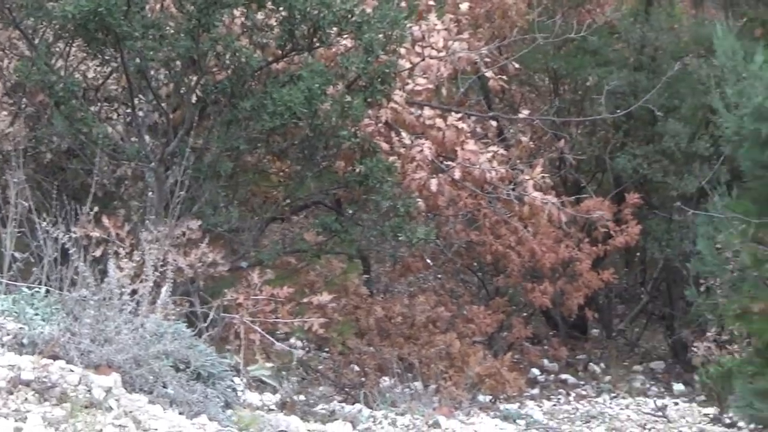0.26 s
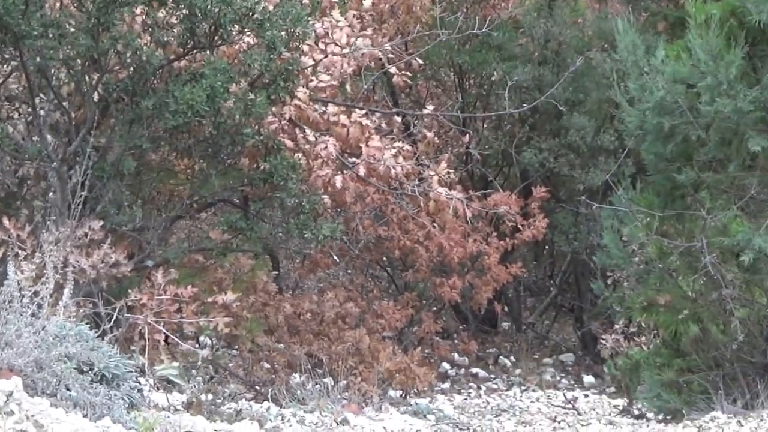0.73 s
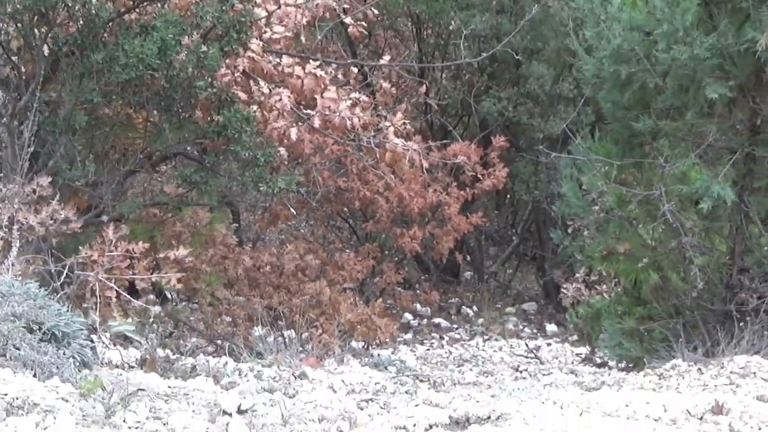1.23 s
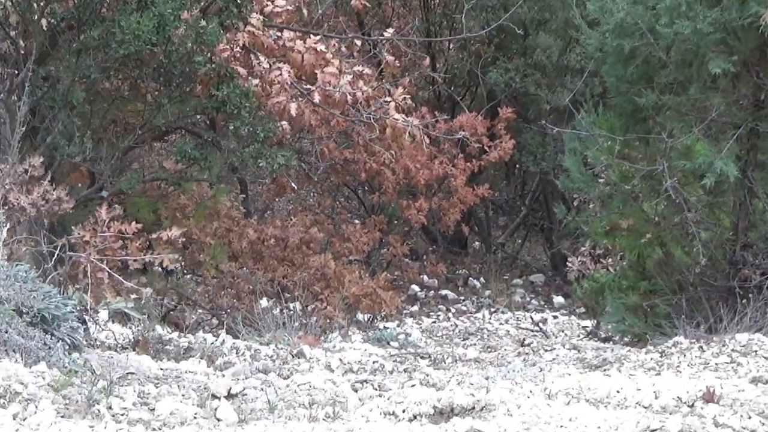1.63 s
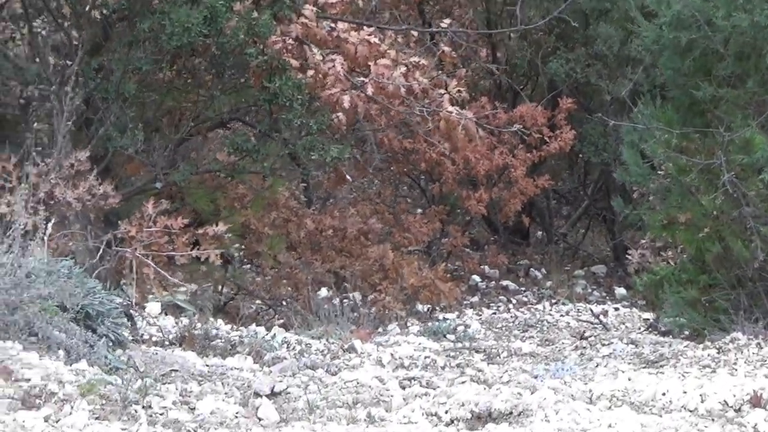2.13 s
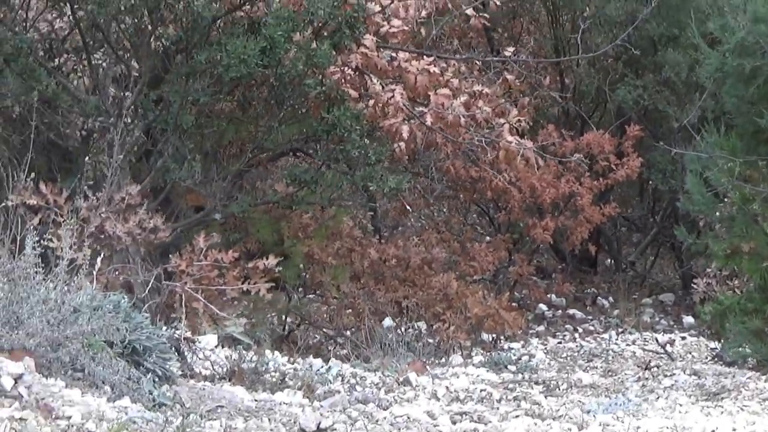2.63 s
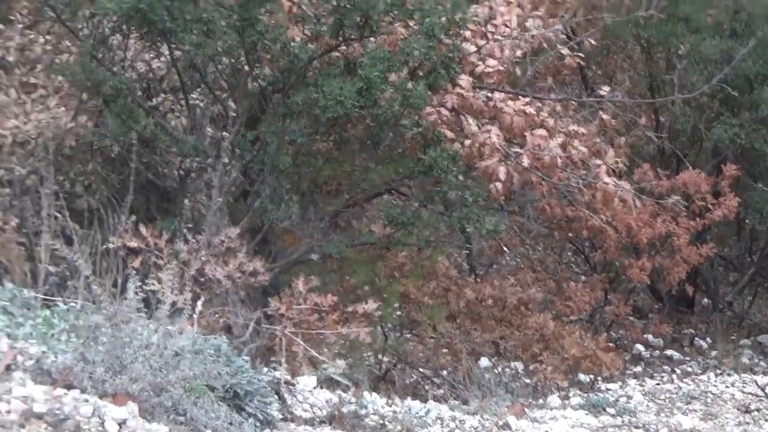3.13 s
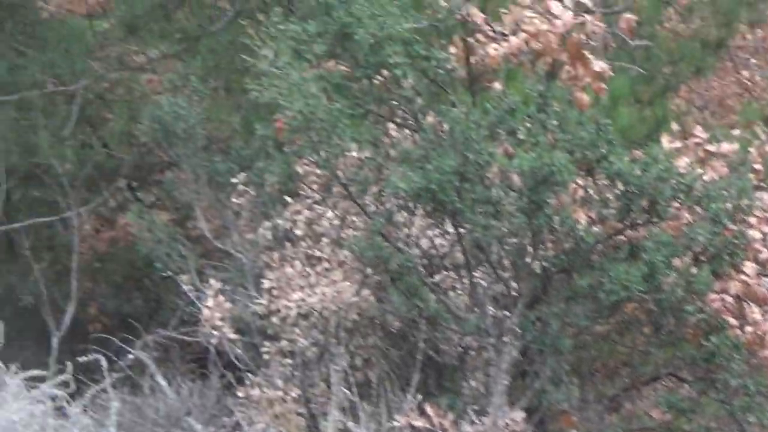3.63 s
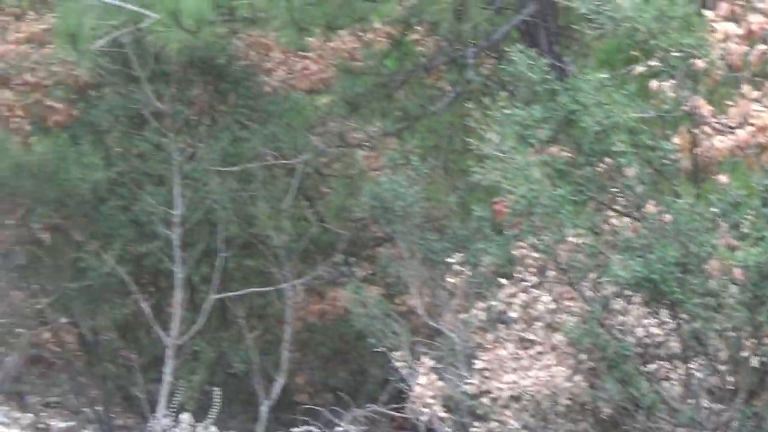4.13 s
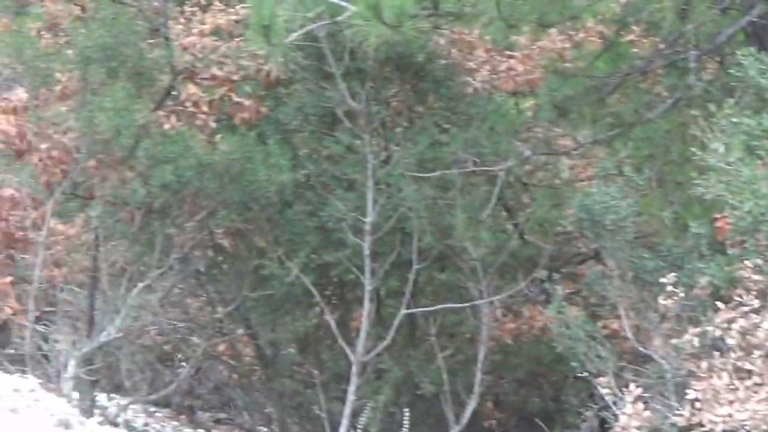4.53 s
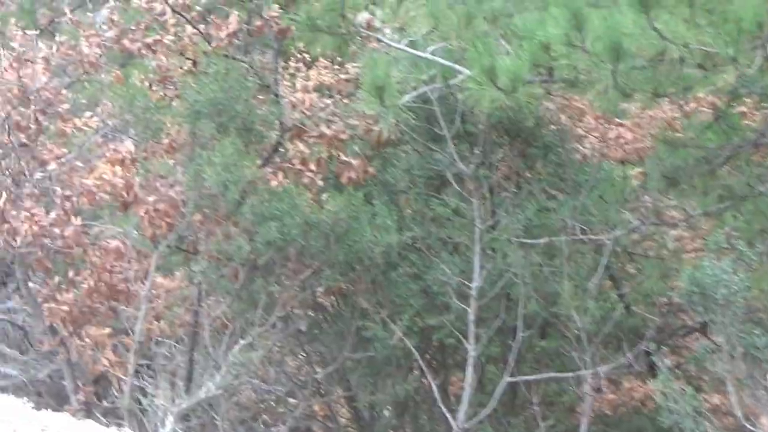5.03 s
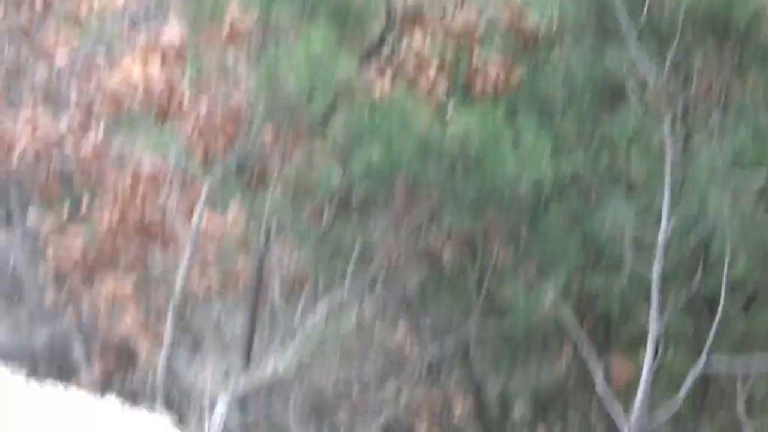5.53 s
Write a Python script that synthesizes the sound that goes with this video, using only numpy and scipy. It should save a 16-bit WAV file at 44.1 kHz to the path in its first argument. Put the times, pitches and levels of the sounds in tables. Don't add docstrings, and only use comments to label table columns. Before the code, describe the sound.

Sharp twig cracks and growing leaf rustle in still woodland, mixed with close camera handling scrapes, creaks and late dull knocks and pebble clicks.

```python
import sys
import numpy as np
from scipy import signal
from scipy.fft import rfft, irfft, next_fast_len
from scipy.io import wavfile
from scipy.ndimage import map_coordinates

SR = 44100
rng = np.random.default_rng(int(sys.argv[2]) if len(sys.argv) > 2 else 0)


def decibels_to_gain(level_db):
    exponent = np.asarray(level_db, float) / 20
    return 10 ** exponent


def put_to_file(sound):
    columns = np.atleast_2d(sound).T
    safe = np.clip(columns, -1, 1)
    whole_steps = np.round(safe * 32767)
    wavfile.write(sys.argv[1], SR, whole_steps.astype(np.int16))


N = 254495


def unit(x):
    return x / np.sqrt(np.mean(x ** 2) + 1e-20)


def along(points, hz):
    f, db = np.transpose(points)
    return decibels_to_gain(np.interp(np.log(hz + 1), np.log(f + 1), db, left=-120, right=-120))


def modes(rows, f):
    total = 0
    for k, (centre, width, db) in enumerate(rows):
        damping = 1j * f * width
        total = total + (-1) ** k * decibels_to_gain(db) * damping / (centre * centre - f * f + damping)
    return total


def filtered(x, response):
    m = next_fast_len(N + 8192)
    return irfft(rfft(x, m) * response(np.fft.rfftfreq(m, 1 / SR)), m)[..., :N]


def shaped(x, points):
    return unit(filtered(x, lambda f: along(points, f)))


def band(x, low_hz, high_hz):
    return signal.lfilter(*signal.butter(2, [low_hz, high_hz], "bandpass", fs=SR), x)


def woody(x, hz, sharpness):
    return signal.lfilter(*signal.iirpeak(hz, sharpness, fs=SR), x)


def curves(rows):
    s, *cols = np.transpose(rows)
    return [np.interp(np.arange(N) / SR, s, c, left=-120, right=-120) for c in cols]


def wobble(rate):
    knots = rng.standard_normal(int(N * rate / SR) + 4)
    return map_coordinates(knots, [np.arange(N) * rate / SR])


def swells(rows, rise_db_s, fall_db_s, rest_db=-120):
    t = np.arange(0, N / SR + .002, .001)[:, None]
    s, db, hold = np.transpose(rows)
    rise = rise_db_s * np.maximum(s - t, 0)
    fall = fall_db_s * np.maximum(t - s - hold, 0)
    power = np.interp(np.arange(N) / SR, t[:, 0], decibels_to_gain(2 * (db - rise - fall)).sum(axis=1))
    return 10 * np.log10(power + decibels_to_gain(2 * np.asarray(rest_db)))


def crackle(rate, spread_db, t60, share):
    size = decibels_to_gain(spread_db * np.minimum(rng.exponential(size=N), 2.8)) * (rng.random(N) < rate / SR)
    puffs = signal.lfilter([1], [1, -decibels_to_gain(-60 / (t60 * SR))], size)
    hiss = np.sqrt(abs(1 - share ** 2)) * rng.standard_normal(N)
    return share * unit(puffs * rng.standard_normal(N)) + hiss


def rub(rows, rate, share):
    slips = crackle(rate, 2.5, .01, share)
    return unit(filtered(slips, lambda f: modes(rows, f) ** 2))


def placed(x, pan_db, loose_db):
    apart = decibels_to_gain(loose_db) * signal.lfilter([.5, .5], [1], np.roll(x, 700))
    return np.array([(x + apart) * decibels_to_gain(pan_db / 2), (x - apart) * decibels_to_gain(-pan_db / 2)])


def empty():
    return np.zeros((2, N + SR))


def seconds(length):
    return np.arange(int(length * SR)) / SR


def add(out, s, sound, pan_db):
    out[:, round(s * SR):][:, :len(sound)] += sound * decibels_to_gain(np.array([[pan_db / 2], [-pan_db / 2]]))


# frequency in Hz, level in dB per Hz.
WOOD_AIR = [(15, -41), (25, -3), (60, -1), (157, -3), (212, 5.5), (416, 3.5), (775, -7.5), (1020, -37),
            (1230, -5.5), (1650, -9), (4250, -15.5), (6380, -4), (10100, -16.5), (16000, -13)]


def air():
    level_db = -49.5 - 4.5
    return placed(decibels_to_gain(level_db) * shaped(rng.standard_normal(N), WOOD_AIR), 0.27, -16.5)


# centre in Hz, width in Hz, level in dB.
PALM_MODES = [(319, 123, 3.5), (500, 190, -4)]
# start in seconds, level in dB, hold in seconds.
PALM_SLIDES = [(0, -55.5, 0.21), (.4, -54, 0.21), (.7, -48.5, 0.022), (.87, -49, 0.022), (1.36, -59, .03),
               (1.45, -52, 0.12), (1.65, -48.5, 0.11), (1.88, -54, 0.068), (3.26, -53, .08),
               (3.36, -48, 0.18), (3.6, -54.5, 0.17), (3.94, -52.5, 0.24), (4.17, -49, 0.18),
               (4.675, -34, 0.011), (4.77, -44, 0.044), (5.09, -44.5, 0.075), (5.4, -51, 0.091),
               (5.7, -45, 0.0097)]


def palm():
    level_db = swells(PALM_SLIDES, 330, 220, rest_db=-63) - 2.7
    return placed(decibels_to_gain(level_db) * rub(PALM_MODES, 320, 0.47), 5.7, -35)


# frequency in Hz, level in dB per Hz.
ARM_RUMBLE = [(15, -44), (25, -20), (48, -11), (75, 0), (113, -1.5), (156, 0), (260, -6.5), (340, -36),
              (570, -120)]
# centre in Hz, width in Hz, level in dB.
SCUFF_MODES = [(536, 990, 0)]
# time in seconds, sway level in dB, grip level in dB.
HAND_LEVELS = [(0, -64, -57.5), (.6, -56.5, -61.5), (.95, -58, -56.5), (1.1, -62, -62), (1.32, -65, -58.5),
               (2.5, -59.5, -66), (2.97, -55.5, -65), (3.57, -54, -56.5), (4.05, -61, -57),
               (4.32, -52, -49.5), (4.6, -56.5, -56), (4.9, -50, -50), (5.3, -49, -51.5),
               (5.77, -47, -49.5)]
# start in seconds, level in dB, hold in seconds.
ARM_JERKS = [(.58, -57, .02), (.9, -59, 0.014), (1.25, -60, 0.011), (2.63, -49, .04), (3.7, -47, 0.079),
             (3.82, -42.5, 0.055), (4.02, -49, 0.14), (4.66, -47, .05), (4.96, -49, .01),
             (5.16, -42, 0.044), (5.32, -45, 0.01), (5.49, -43.5, 0.011), (5.75, -50, .02)]
# start in seconds, level in dB, hold in seconds.
FINGER_SCUFFS = [
    (1.25, -47, 0.016),
    (4.65, -56, 0.11),
    (5.01, -44, 0.0082),
    (5.1, -43.5, 0.011),
    (5.24, -44.5, 0.0086),
]


def arm_and_grip():
    sway_db, grip_db = curves(HAND_LEVELS)
    jerk_db = swells(ARM_JERKS, 170, 260, sway_db) + 0.06
    scuff_db = swells(FINGER_SCUFFS, 310, 390, grip_db) + 2.0
    shake = shaped(rng.standard_normal(N) * decibels_to_gain(3.8 * wobble(30)), ARM_RUMBLE)
    out = placed(decibels_to_gain(jerk_db) * shake, 2.6, -28)
    return out + placed(decibels_to_gain(scuff_db) * rub(SCUFF_MODES, 300, 0.87), 2.7, -40)


# centre in Hz, width in Hz, level in dB.
STRAP_MODES = [(992, 207, 5), (1280, 450, -7)]
# start in seconds, level in dB, hold in seconds.
STRAP_TUGS = [(.085, -38, 0.061), (.2, -46, 0.036), (.55, -53, 0.15), (.77, -42, 0.048), (.93, -44, 0.04),
              (1.86, -51.5, .02), (2.09, -46, 0.0092), (4.28, -40, 0.003), (4.75, -43, 0.11),
              (4.95, -38, .002), (5.01, -59, .01), (5.69, -42, 0.0046)]


def strap():
    level_db = swells(STRAP_TUGS, 720, 560, rest_db=-57) - 7.5
    return placed(decibels_to_gain(level_db) * rub(STRAP_MODES, 300, 0.17), 3.3, -40)


# centre in Hz, width in Hz, level in dB.
HINGE_MODES = [(1583, 143, 2.5), (1860, 185, 3.5), (2000, 270, 0), (3440, 1600, -11)]
# start in seconds, level in dB, hold in seconds.
LOUD_CREAKS = [
    (.783, -33, 0.037),
    (.906, -43, 0.072),
    (5.68, -32.5, 0.0054),
]
# start in seconds, level in dB, hold in seconds.
FAINT_CREAKS = [
    (.085, -56.5, 0.16),
    (.5, -58, 0.29),
    (1.4, -59, 0.26),
    (4.25, -51.5, 0.086),
    (2.35, -65, 0.19),
    (3.31, -56, 0.24),
    (5.6, -56, .06),
]


def hinge():
    faint_db = swells(FAINT_CREAKS, 70, 70)
    creak_db = swells(LOUD_CREAKS, 2500, 1600, faint_db) - 2.0
    return placed(decibels_to_gain(creak_db) * rub(HINGE_MODES, 390, 0.41), 5.2, -40)


# start in seconds, level in dB, hold in seconds, crisp top in dB.
FAR_STIRS = [(.085, -45, 0.042, 0), (.227, -51, 0.021, -6), (.389, -45.5, .002, -12),
             (.479, -51.5, 0.087, -1), (.62, -68, .13, -10), (.79, -47, 0.033, -8), (.884, -50.5, 0.13, -8),
             (1.065, -50, .01, -9), (1.19, -46.5, 0.054, -7), (1.259, -50, .002, 8),
             (1.341, -55, 0.011, 10), (1.42, -64, 0.065, 13), (1.525, -57, .005, -15),
             (1.86, -55, .015, -20), (2.008, -50.5, 0.072, -14), (2.17, -52, 0.029, -5),
             (2.245, -42.5, .005, -9), (2.32, -46.5, 0.076, 3.5), (2.41, -52, 0.085, -1)]
# start in seconds, level in dB, hold in seconds, crisp top in dB.
NEAR_STRIDES = [(2.6, -41.5, 0.029, -1), (2.66, -40.5, 0.081, 2.5), (2.815, -40.5, 0.26, -2),
                (2.97, -44, .04, -13), (3.015, -39.5, 0.031, 4), (3.09, -42.5, 0.11, -4),
                (3.36, -41, 0.026, -6), (3.421, -36.5, 0.016, -5), (3.543, -35.5, 0.0046, -8),
                (3.655, -28.5, 0.011, -3), (3.71, -29.5, 0.03, -4), (3.818, -34.5, 0.042, -2),
                (3.9, -36.5, 0.13, -8), (4.05, -39.5, 0.21, -11), (4.43, -40, 0.027, -9),
                (4.53, -36, 0.11, -3), (4.66, -31.5, 0.058, -9), (4.76, -37, 0.11, -3),
                (4.912, -29, .002, -14), (4.96, -39.5, 0.16, -8), (5.19, -40, 0.079, -13),
                (5.33, -41, 0.046, -16), (5.43, -49, 0.0046, 2), (5.49, -38.5, .002, -8),
                (5.56, -41.5, 0.095, -14), (5.72, -52, .002, -13)]


def steps(bed_db, crisp):
    def rows(table):
        return [(s, db + crisp * top_db, hold) for s, db, hold, top_db in table]

    bed_crisp_db = -7
    far_db = swells(rows(FAR_STIRS), 620, 350, bed_db + crisp * bed_crisp_db)
    return swells(rows(NEAR_STRIDES), 310, 208, far_db)


# frequency in Hz, level in dB per Hz.
LEAF_BODY = [(2240, -22), (3800, -19.5), (5070, -6.5), (6510, 2.5), (7860, -2), (9000, -2), (10100, -3.5),
             (12500, -15), (16200, -23), (22000, -120)]
# frequency in Hz, level in dB per Hz.
LEAF_TOP = [(9500, -10), (11500, -5.5), (13000, -4), (15800, -8), (18000, -40)]
# frequency in Hz, level in dB per Hz.
STEM_COLOUR = [(900, -10.5), (2000, 2), (2600, -1.5), (3400, -0.5), (4500, -2), (5500, -19.5)]
# time in seconds, level in dB.
APPROACH_LEVEL = [(0, -52), (.46, -51.5), (.7, -49), (1.13, -55.5), (1.5, -51), (2.1, -54.5), (2.53, -55),
                  (2.62, -49), (3.26, -45.5), (3.6, -54), (3.8, -38.5), (4.35, -37), (4.7, -37.5),
                  (5.1, -45), (5.77, -39.5)]
# start in seconds, level in dB, hold in seconds.
STEM_BRUSHES = [(.07, -45, 0.042), (.79, -41, 0.015), (1.25, -49, 0.06), (1.33, -52.5, 0.19),
                (3.4, -49, 0.02), (3.69, -53, 0.07), (4.3, -42.5, 0.048), (4.68, -39, 0.0084),
                (5.12, -46, 0.0044), (5.249, -39.5, 0.0063), (5.36, -42.5, 0.025), (5.66, -45.5, 0.028)]


def litter():
    bed_db, = curves(APPROACH_LEVEL)
    leaf_db, crisp_db = steps(bed_db, False), steps(bed_db, True)
    stem_rest_db = -56.5 + 0.71 * (leaf_db + 50.5)
    stem_db = swells(STEM_BRUSHES, 670, 330, stem_rest_db)
    breaks = crackle(rate=1300, spread_db=5.0, t60=0.00062, share=0.45) * decibels_to_gain(1.36 * wobble(90))
    leaf = decibels_to_gain(leaf_db + 0.05) * shaped(breaks, LEAF_BODY)
    crisp = decibels_to_gain(crisp_db - 6.5) * shaped(breaks, LEAF_TOP)
    stems = decibels_to_gain(stem_db - 2.46) * shaped(breaks, STEM_COLOUR)
    return placed(leaf + crisp, 1.0, -29.0) + placed(stems, 0.4, -82)


def splinter_burst(t):
    fade = decibels_to_gain(-19.0 - 60 * t / 0.00011) + decibels_to_gain(-60 * t / 0.031) + decibels_to_gain(-25.0 - 60 * t / 0.045)
    return np.sign(rng.standard_normal(len(t))) * fade


# start in seconds, peak in dB, broad mode in Hz,
# low crack in dB, top crack in dB.
TWIG_SNAPS = [(0.0652, -4, 4750, -4, -11), (0.0691, -5.5, 3830, -7.5, -5), (0.7692, -7.5, 1690, -1, -27),
              (0.772, -18, 1750, 5.5, -31), (1.0324, -5.5, 3300, -10, -14),
              (1.0368, -13.5, 2220, -10.5, -15), (1.0427, -13, 4340, -13, -21),
              (1.2442, -17.5, 1900, -16, -20), (1.261, -20, 1860, -13, -22), (1.946, -22, 3070, -3, -14),
              (2.232, -19.5, 2000, -10.5, -10), (2.2365, -25, 3730, -32, -1),
              (2.327, -18.5, 2000, -12, -10), (3.671, -14, 4530, -15.5, 2), (4.282, -17, 5400, -20, -20),
              (4.7167, -20.5, 4360, 0, -12), (4.846, -30, 1660, 7, -15), (5.4861, -16, 2800, -9, -7)]


def snaps():
    out, t = empty(), seconds(1 / 16)
    for s, db, hz, low_db, top_db in TWIG_SNAPS:
        dull = band(splinter_burst(t), 1300, 4600)
        hard = band(splinter_burst(t), 5200, 6860)
        bright = band(splinter_burst(t), 8200, 10800)
        thin = band(splinter_burst(t), 11500, 14000) * decibels_to_gain(-60 * t / 0.012)
        low = 0.7 * dull + 3.9 * woody(splinter_burst(t), hz, 7)
        middle = np.sqrt(max(1.05 - decibels_to_gain(2 * low_db) - decibels_to_gain(2 * top_db), .004))
        top = decibels_to_gain(top_db - 60 * t / 0.04) * (bright + 0.93 * thin)
        crack = decibels_to_gain(low_db) * low + 1.18 * middle * hard + 2.4 * top
        add(out, s, decibels_to_gain(db - 6.5) * crack, -0.14 * top_db)
    return out[:, :N]


# frequency in Hz, level in dB per Hz.
SLEEVE_COLOUR = [(1500, -10), (2500, -3), (4000, -4), (7000, 3), (10000, -9), (12000, -30)]
# start in seconds, level in dB, hold in seconds.
SLEEVE_SWEEPS = [
    (.09, -60, 0.038),
    (1.3, -53.5, 0.22),
    (4.62, -62, 0.12),
]


def sleeve():
    sweep = shaped(rng.standard_normal(N), SLEEVE_COLOUR)
    return placed(decibels_to_gain(swells(SLEEVE_SWEEPS, 300, 150)) * sweep, 5.2, -30)


def blows(rows, sharp, tail_db, t60, pan_db):
    out, t = empty(), seconds(1 / 32)
    for s, db, hz in rows:
        fray = decibels_to_gain(tail_db - 60 * t / t60) * rng.standard_normal(len(t)) * np.sqrt(hz / SR)
        ring = woody((t == 0) + fray, hz, sharp)
        add(out, s, decibels_to_gain(db) * ring / np.abs(ring).max(), pan_db)
    return out[:, :N]


# start in seconds, peak in dB, centre in Hz.
FIBRE_POPS = [(0.304, -37, 2010), (0.612, -33, 1090), (0.642, -31.5, 970), (0.665, -26, 1890),
              (1.0475, -22, 2500), (1.199, -34, 695), (1.2437, -24, 2500), (1.2592, -21, 4500),
              (1.2632, -35, 5000), (1.289, -35, 2790), (1.483, -35, 1200), (1.682, -27, 3000),
              (1.719, -31, 1850), (3.5085, -29, 2600), (3.72, -24, 2200), (4.281, -22.5, 1100),
              (4.351, -36, 700), (4.6531, -29, 2500), (4.6711, -26, 2500), (4.6765, -25, 4000),
              (4.69, -30, 2000), (4.713, -21, 2000), (4.7187, -14, 2200), (4.7215, -8, 3300),
              (4.766, -17, 2490), (4.812, -33, 3500), (4.845, -17.5, 3800), (4.887, -25, 900),
              (4.9015, -18, 4500), (4.943, -26, 1060), (5.088, -24, 1200), (5.238, -36, 700),
              (5.254, -23, 1200), (5.29, -42, 630), (5.3415, -12, 4200), (5.379, -32, 2200),
              (5.4135, -26, 3800), (5.424, -20, 4200), (5.432, -29, 4630), (5.487, -27.5, 1210),
              (5.497, -28, 1000), (5.521, -32, 500), (5.587, -44, 704), (5.633, -43, 600),
              (5.656, -29, 2500), (5.6678, -21, 1790), (5.684, -27, 2500), (5.713, -23.5, 500),
              (5.7356, -24, 4000)]


def fibres():
    return blows(FIBRE_POPS, sharp=1.4, tail_db=-25, t60=0.014, pan_db=3)


# start in seconds, peak in dB, wood mode in Hz.
STICK_CLACKS = [(0.392, -39.5, 1720), (0.9256, -33, 1110), (0.9433, -34.5, 2600), (1.5264, -48, 1810),
                (2.065, -38.5, 1910), (3.508, -36, 2390), (4.5938, -39, 2620), (4.8115, -33, 1360),
                (4.997, -31.5, 3060), (5.0167, -33.5, 2050), (5.1122, -27.5, 2350), (5.179, -40, 2030),
                (5.3709, -29, 2300), (5.414, -27, 4270), (5.467, -35.5, 2200), (5.5877, -33, 2280),
                (5.64, -30.5, 1880), (5.6738, -33, 1820), (5.701, -30, 2570), (5.7147, -34, 1860),
                (5.7614, -30, 2200)]


def sticks():
    out, t = empty(), seconds(1 / 16)
    for s, db, hz in STICK_CLACKS:
        contact = band(splinter_burst(t), 5200, 6860)
        add(out, s, decibels_to_gain(db + 10.5) * (woody(splinter_burst(t), hz, 2.66) + 0.25 * contact), 2.5)
    return out[:, :N]


# centre in Hz, width in Hz, level in dB.
BUCKLE_MODES = [(1750, 160, 3.5), (2804, 260, 2), (3500, 530, -0.5)]
# start in seconds, level in dB, hold in seconds.
BUCKLE_CHAFES = [(.5, -57.5, 0.23), (.7, -57.5, 0.38), (1.29, -58, 0.046), (1.52, -56, .22),
                 (1.8, -64, 0.16), (2.44, -63, .14), (3.42, -56, 0.099), (4.27, -48, 0.061), (4.7, -57, .1),
                 (5.05, -53.5, 0.056), (5.38, -57, 0.05), (5.62, -51, 0.07)]


def buckle():
    grains = crackle(rate=250, spread_db=0.0, t60=0.012, share=0.6)
    chafe = unit(filtered(grains, lambda f: modes(BUCKLE_MODES, f) ** 2))
    return placed(decibels_to_gain(swells(BUCKLE_CHAFES, 250, 140)) * chafe, 4.4, -40)


# start in seconds, peak in dB, pitch in Hz.
SINGLE_SLIPS = [(0.786, -23, 1680), (0.794, -23, 1760), (.798, -21, 1760), (.81, -25, 1670),
                (0.813, -29, 1920), (.819, -33, 1710), (.91, -33, 1780), (0.924, -37, 1470),
                (0.9437, -31.5, 1930), (.957, -39, 1690), (.968, -38, 1700), (1.346, -44, 322),
                (1.589, -46.5, 326), (1.7, -47, 337), (1.801, -45.5, 332), (3.238, -46, 366),
                (3.282, -43.5, 353), (3.33, -49.5, 347), (3.365, -42, 334), (3.415, -43, 340),
                (3.495, -50, 323.4)]


def slips():
    out = empty()
    for s, db, hz in SINGLE_SLIPS:
        cycles = 17.5 if hz < 800 else 9.5
        u = seconds(1 / 6) * hz / cycles
        swell = 4 * u * np.exp(1 - 4 * u)
        add(out, s, decibels_to_gain(db) * swell * np.sin(2 * np.pi * (cycles * u + rng.random())), 5.2)
    return out[:, :N]


# start in seconds, peak in dB.
LEAF_TICKS = [(0.8865, -22), (1.528, -25), (1.877, -21.5), (2.3284, -10), (2.712, -18), (2.813, -17),
              (2.963, -15), (3.0175, -11), (3.3375, -17), (3.365, -20), (3.384, -13), (3.532, -15),
              (3.654, -8), (3.661, -16), (3.7264, -17), (3.8171, -13.5), (4.2047, -10), (4.7701, -11),
              (4.889, -25), (5.3525, -28)]


def ticks():
    out, t = empty(), seconds(1 / 16)
    for s, db in LEAF_TICKS:
        fade = decibels_to_gain(db - 5.5 - 60 * t / 0.037) + decibels_to_gain(db - 60 * t / 0.00079)
        tick = np.sign(rng.standard_normal(len(t))) * fade
        add(out, s, 0.5 * band(tick, 5200, 6860) + 0.46 * band(tick, 8200, 10800), .3)
    return out[:, :N]


# start in seconds, peak in dB, centre in Hz.
BRITTLE_SPARKS = [(1.0328, -13, 6000), (1.5285, -27, 7000), (1.9462, -21.5, 12100), (2.3288, -12, 12000),
                  (2.601, -27, 10000), (2.676, -19, 9500), (2.712, -15, 11500), (2.866, -19, 6400),
                  (2.9498, -30, 8440), (2.812, -25, 5500), (2.964, -29, 5500), (2.974, -21, 7500),
                  (3.006, -22, 9000), (3.0195, -24, 8800), (3.027, -25, 9000), (3.04, -21, 9500),
                  (3.094, -27, 8000), (3.115, -20, 7500), (3.275, -36, 6700), (3.3828, -26, 5500),
                  (3.4187, -27, 8300), (3.686, -19, 5500), (3.697, -19, 7000), (3.6716, -3, 11000),
                  (3.6725, -10, 6800), (3.7268, -9.5, 8000), (4.122, -29, 5500), (4.139, -31, 5200),
                  (4.194, -21, 5000), (4.206, -19, 4500), (4.2835, -19, 5600), (4.8984, -20, 8400)]


def brittle_leaves():
    return blows(BRITTLE_SPARKS, sharp=2.1, tail_db=-8, t60=0.004, pan_db=.3)


# start in seconds, peak in dB, pitch in Hz.
CASING_BUMPS = [(1.244, -29, 790), (1.268, -31, 348), (1.587, -40, 332), (2.591, -43, 182),
                (4.257, -27, 275), (4.282, -32, 275), (4.598, -25.5, 287), (4.648, -27, 314),
                (4.659, -23, 660), (4.665, -25, 360), (4.671, -25, 515), (4.692, -22, 453),
                (4.677, -16, 310), (4.685, -13, 340), (4.697, -23, 297), (4.718, -13.5, 696),
                (4.77, -16.5, 422), (4.843, -24.5, 756), (5.01, -27.5, 940), (5.071, -22.5, 956),
                (5.157, -24, 306), (5.244, -31, 167), (5.299, -27, 130), (5.668, -25.5, 197),
                (5.749, -24.5, 164)]


def bumps():
    out, t = empty(), seconds(1 / 8)
    fade_db = -60 * t / 0.027
    for s, db, hz in CASING_BUMPS:
        overtone = .5 * np.sin(2 * np.pi * 1.67 * hz * t) * decibels_to_gain(fade_db)
        ring = (np.sin(2 * np.pi * hz * t) + overtone) * (1 - np.exp(-t / 0.00037))
        thud = 1.2 * woody(rng.standard_normal(len(t)), 900, 0.61) * decibels_to_gain(-60 * t / 0.022)
        add(out, s, decibels_to_gain(db - 5.0 + fade_db) * (ring + thud), 4)
    return out[:, :N]


# start in seconds, peak in dB.
PEBBLE_CLICKS = [
    (5.209, -5),
    (5.2119, -5),
    (5.3383, -11),
]
# pitch in Hz, level in dB, 60 dB decay in seconds.
STONE_MODES = [(2044, 3, 0.025), (3300, 5.5, 0.013), (2900, 5.5, 0.0043), (4120, -8, 0.014),
               (6020, 1, 0.0074)]


def pebbles():
    out, t = empty(), seconds(1 / 16)
    for s, db in PEBBLE_CLICKS:
        ring = 0
        for hz, level, t60 in STONE_MODES:
            ring = ring + decibels_to_gain(level + rng.normal(0, 2.9) - 60 * t / t60) * np.sin(2 * np.pi * hz * t)
        grit = 0.92 * band(rng.standard_normal(len(t)), 1900, 7000) * decibels_to_gain(-60 * t / 0.022)
        add(out, s, decibels_to_gain(db - 9.5) * (1 - np.exp(-t / 0.00099)) * (ring + grit), 2.5)
    return out[:, :N]


def scene():
    camera = palm() + arm_and_grip() + strap() + hinge() + sleeve() + buckle() + slips() + bumps()
    animal = litter() + snaps() + fibres() + sticks() + ticks() + brittle_leaves() + pebbles()
    return air() + camera + animal


# frequency in Hz, gain in dB.
MIC_BAND = [(10, -15), (50, 0), (15600, 0), (15900, -22), (16600, -30), (16800, -120)]


def microphone(dry):
    return filtered(dry, lambda f: along(MIC_BAND, f))


def low_pass(x):
    return signal.sosfilt(signal.butter(12, 16650, fs=SR, output="sos"), x)


def record(dry):
    mix = microphone(dry)
    return low_pass(mix)


dry = scene()
out = record(dry)
put_to_file(out)
```